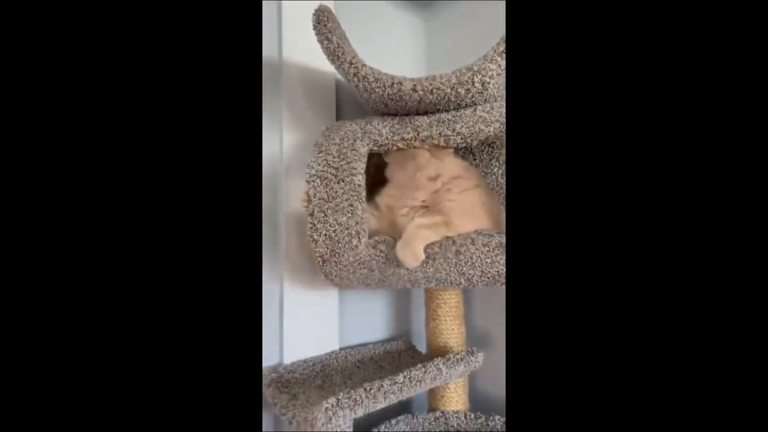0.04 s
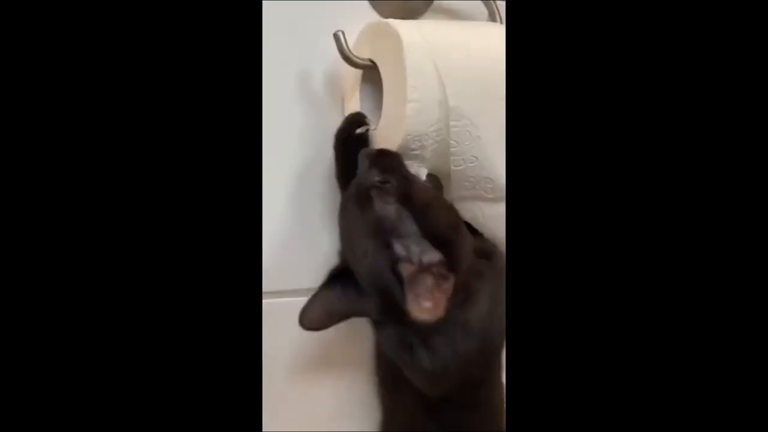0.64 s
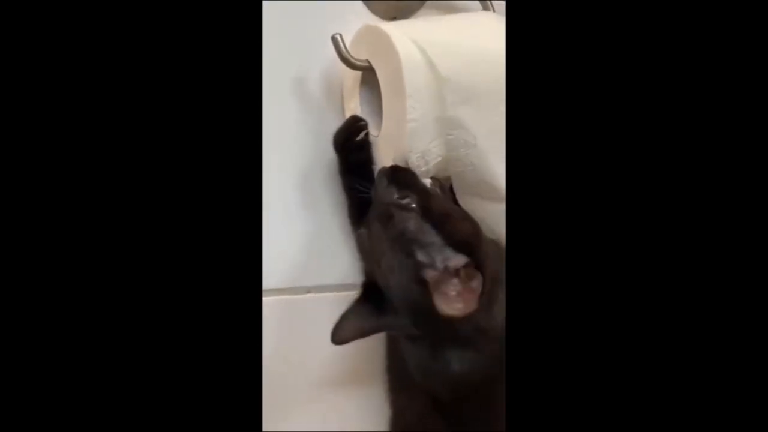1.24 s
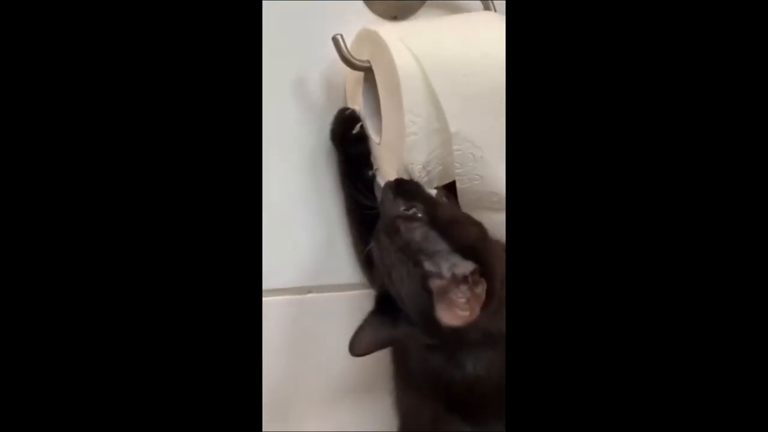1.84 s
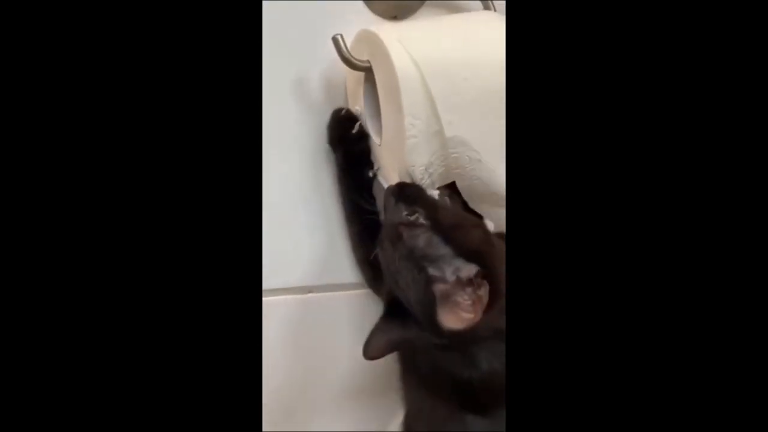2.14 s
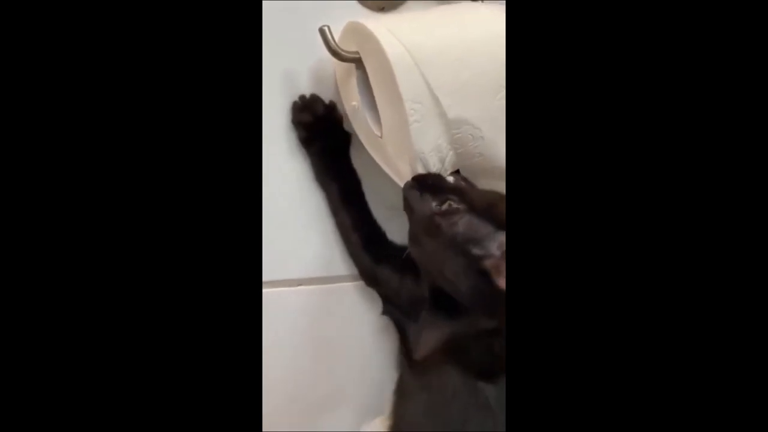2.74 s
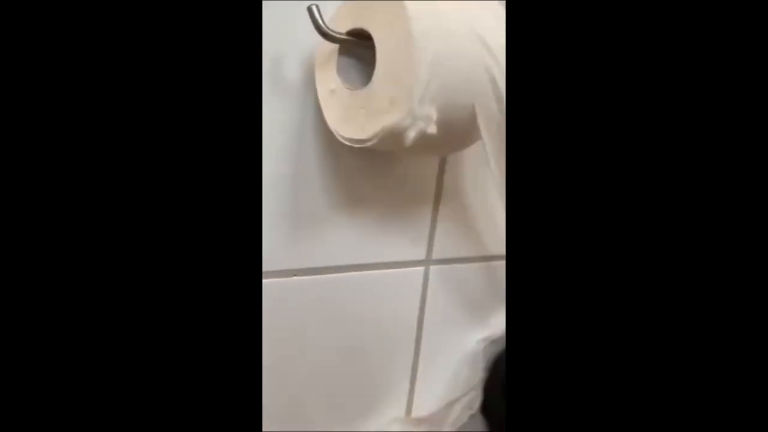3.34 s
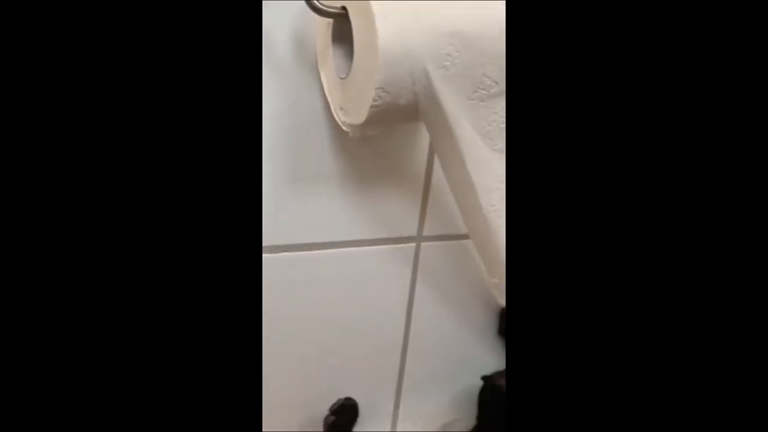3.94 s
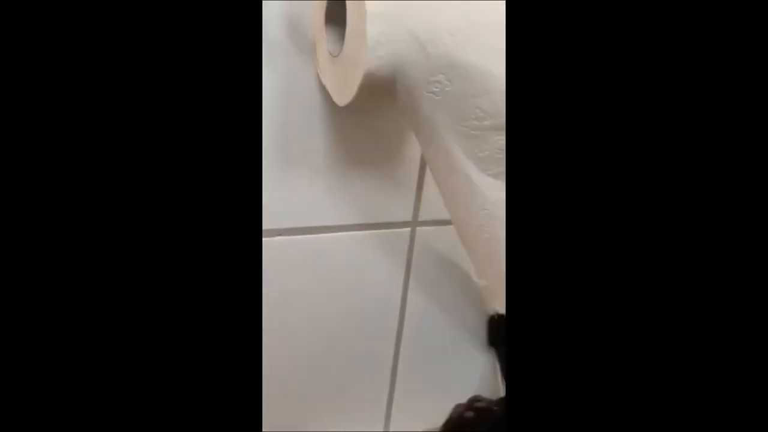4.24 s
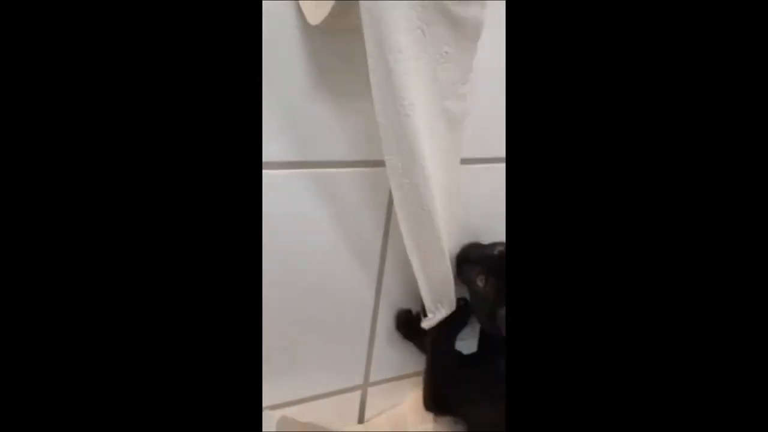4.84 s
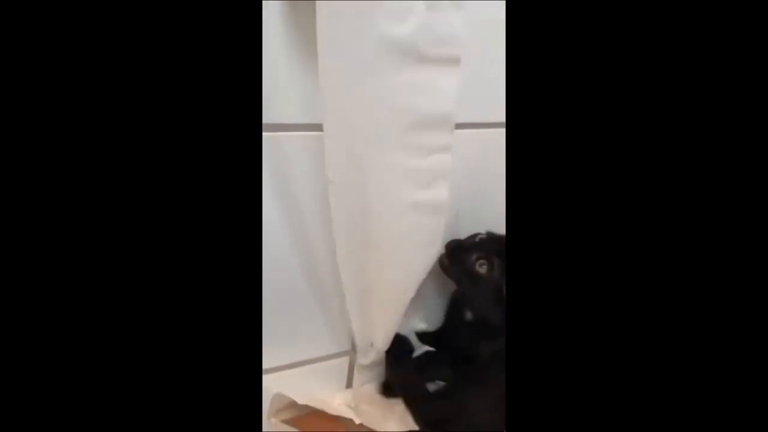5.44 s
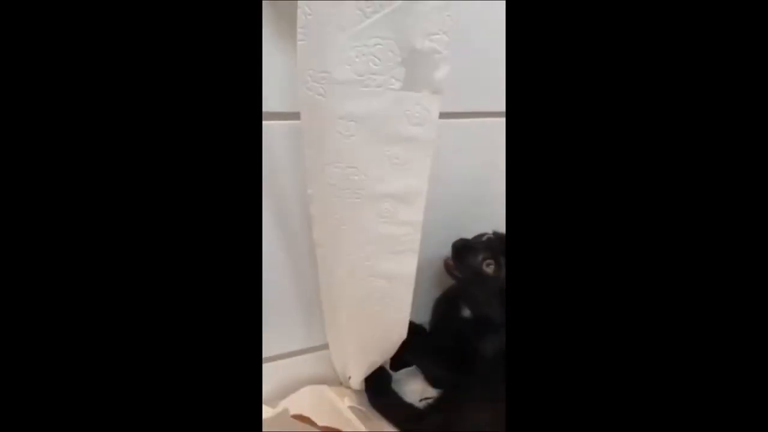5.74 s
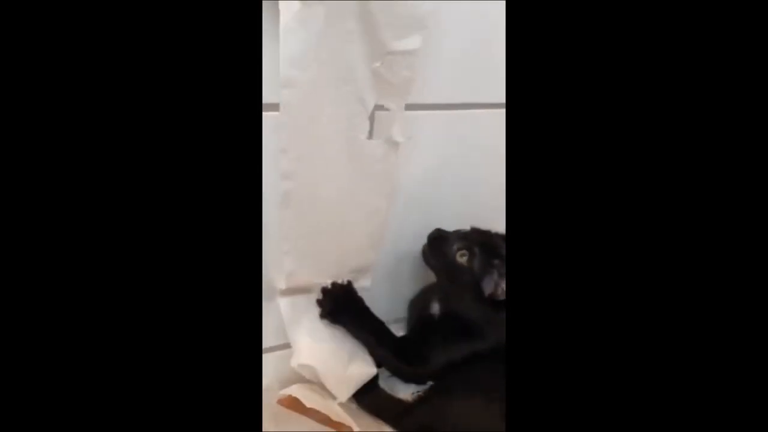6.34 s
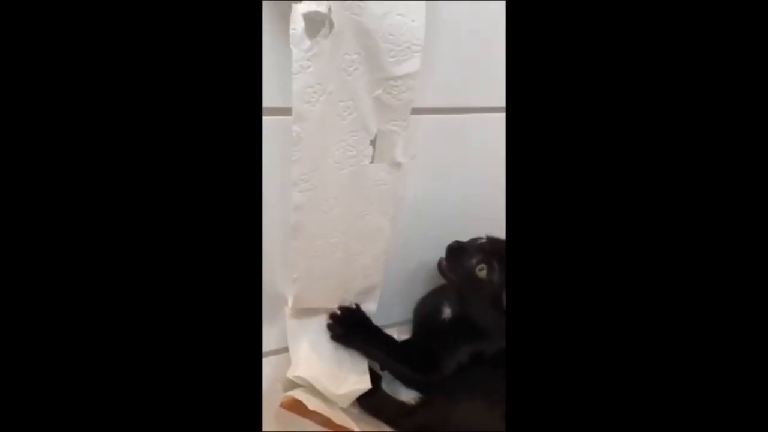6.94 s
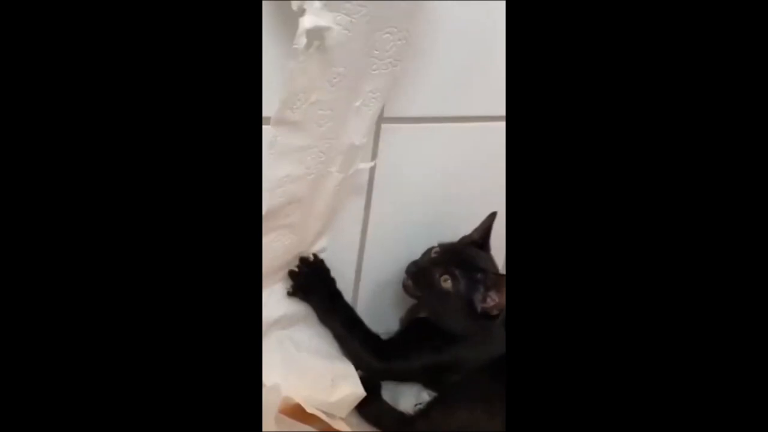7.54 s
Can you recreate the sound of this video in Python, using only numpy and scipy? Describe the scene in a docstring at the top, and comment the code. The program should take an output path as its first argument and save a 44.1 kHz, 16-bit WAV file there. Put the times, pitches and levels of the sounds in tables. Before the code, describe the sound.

After a moment of room hum, a toilet roll knocks on its holder as paws thud and paper crinkles and tears in a small bathroom.

```python
"""A humming room, where a cat scratches its carpeted tree and bumps it; after half a second the scene
changes abruptly to a small tiled bathroom. A kitten claws at a paper roll. Impacts excite damped modes:
the roll knocks on its holder and paws thud on the wall. Friction and buckling make broadband noise:
the roll rubs as it unwinds, and the snatched sheet crinkles, tears and flaps. The tiles reverberate."""
import sys
import numpy as np
from scipy import signal
from scipy.fft import rfft, irfft, next_fast_len
from scipy.io import wavfile
from scipy.ndimage import uniform_filter1d, map_coordinates

SR = 44100
rng = np.random.default_rng(int(sys.argv[2]) if len(sys.argv) > 2 else 0)


def wav_record(signal):
    """Record a signal, one row per channel, as 16-bit PCM in the file named by sys.argv[1]."""
    frames = np.transpose(np.atleast_2d(signal))
    bounded = np.clip(frames, -1, 1)
    # unit amplitude maps onto the largest positive 16-bit level
    quanta = np.round(bounded * 32767).astype(np.int16)
    wavfile.write(sys.argv[1], SR, quanta)


N = 334690
TIME = np.arange(N) / SR  # [s]
AGE = np.arange(SR // 2) / SR  # time since a blow [s]


def amp(db):
    """The decibel law: 20 dB is a factor of ten in amplitude."""
    return 10 ** (np.asarray(db) / 20)


def unit(x):
    """Normalisation to rms 1."""
    return x / np.sqrt(np.mean(x ** 2) + 1e-20)


def along(points, hz):
    """Interpolation of (frequency, value) points on a logarithmic frequency axis."""
    frequencies, values = np.transpose(points)
    return np.interp(np.log(hz + 1), np.log(frequencies), values)


def add(track, s, sound):
    """Superposition: a sound joins the track at time s."""
    part = track[..., round(s * SR):][..., :sound.shape[-1]]
    part += sound[..., :part.shape[-1]]


def wobble(rate):
    """Slow random modulation: a spline through rate knots a second."""
    knots = rng.standard_normal(int(N * rate / SR) + 4)
    return map_coordinates(knots, [TIME * rate])


def swell(s, rise, fall, hold=0):
    """Exponential growth and decay: up 60 dB in rise seconds to time s, a hold, down 60 dB in fall."""
    out = np.zeros(N)
    span = slice(max(round((s - rise) * SR), 0), round((s + hold + fall) * SR))
    age = TIME[span] - s
    depth = np.maximum(-age / rise, (age - hold) / fall)
    out[span] = np.exp(-np.log(1000) * np.maximum(depth, 0))
    return out


def fade(t60, attack):
    """Damping: after a soft onset, a blow loses 60 dB in t60 seconds."""
    return np.exp(-np.log(1000) * AGE / t60) * (1 - np.exp(-AGE / attack))


def filtered(x, response):
    """Linear filtering: the spectrum is multiplied by a frequency response."""
    n = x.shape[-1]
    size = next_fast_len(n + SR // 4)
    return irfft(rfft(x, size) * response(np.fft.rfftfreq(size, 1 / SR)), size)[..., :n]


def coloured(pair, spectrum):
    """Spectral shaping of two signals, at rms 1."""
    return unit(filtered(pair, lambda hz: amp(along(spectrum, hz))))


def noise(spectrum, length=N):
    """Filtered Gaussian noise: two independent signals with one spectrum."""
    return coloured(rng.standard_normal((2, length)), spectrum)


def grains(spectrum, rate, spread_db, smooth):
    """Stick-slip friction: tiny slips of unequal size over a share of smooth noise."""
    slips = (rng.random(N) < rate / SR) * amp(spread_db * np.minimum(rng.standard_normal(N), 2))
    rough = unit(slips * rng.standard_normal((2, N)))
    return coloured(rough + smooth * rng.standard_normal((2, N)), spectrum)


def patchy(x, depth_db):
    """Time-varying filtering: random patches of gain favour now one pitch, now another."""
    spectra = signal.stft(x, nperseg=1024)[2]
    patches = uniform_filter1d(rng.standard_normal(spectra.shape[1:]), size=8, axis=0)
    patches = uniform_filter1d(patches, size=5, axis=1)
    return signal.istft(spectra * amp(depth_db * unit(patches)), nperseg=1024)[1][:, :N]


def burst(spectrum, t60, attack):
    """Contact noise: a coloured puff with exponential decay."""
    return noise(spectrum, len(AGE)) * fade(t60, attack)


def push(spectrum):
    """A minimum-phase pulse: the sharpest causal push with a given spectrum, of peak 1."""
    n = len(AGE)
    cepstrum = irfft(np.log(amp(along(spectrum, np.fft.rfftfreq(n, 1 / SR)))), n)
    cepstrum[1:n // 2] *= 2
    cepstrum[n // 2 + 1:] = 0
    pulse = irfft(np.exp(rfft(cepstrum)), n)
    return pulse / np.abs(pulse).max()


def ring(modes, attack, scatter_db, detune):
    """Modal superposition: two sums of damped sines with scattered strengths and pitches, of peak 1."""
    pair = np.zeros((2, len(AGE)))
    for k, (hz, db, t60) in enumerate(modes):
        strength = (-1) ** k * amp(db + scatter_db * rng.normal(size=(2, 1)))
        pitch = hz * (1 + detune * rng.normal(size=(2, 1)))
        pair += strength * fade(t60, attack) * np.sin(2 * np.pi * pitch * AGE)
    return pair / np.abs(pair).max(axis=1, keepdims=True)


# Air of the first room (frequency [Hz], spectral level [dB])
AIR_SPECTRUM = [(28, -11), (55, 9), (110, -9), (250, -11.5), (430, -21.5), (560, -26.5), (1500, -31.5),
                (3700, -32), (4700, -36.5), (8000, -45.5), (10000, -65), (13000, -42), (15700, -54)]
# Tones of a machine (frequency [Hz], level [dB])
HUM_TONES = [(48.4, -47.5), (247.6, -62.5), (414.5, -59)]
def humming_room():
    """Phase modulation: a machine's tones waver slightly over the broadband noise of the air."""
    hum = sum(amp(db) * np.sqrt(2) * np.sin(2 * np.pi * hz * TIME + 0.73 * wobble(4.6))
              for hz, db in HUM_TONES)
    return hum + amp(-39.5) * noise(AIR_SPECTRUM)


# Background of the bathroom (frequency [Hz], spectral level [dB])
AMBIENT_SPECTRUM = [(20, -18), (45, 3), (68, 6.5), (95, -0.5), (130, -17), (320, -15.5), (500, -18.5),
                    (1200, -27.5), (4000, -37.5), (12000, -52.5), (15700, -61.5)]
def bathroom_ambience():
    """Stationary noise: a faint, steady rumble."""
    return amp(-69.0) * noise(AMBIENT_SPECTRUM)


# Reverberation of the bathroom (frequency [Hz], T60 [s])
TILE_DECAY = [(80, 0.7), (260, 0.65), (700, 0.23), (2000, 0.35), (5000, 0.39), (13000, 0.074)]
def bathroom(x, wet_db):
    """Reverberation by convolution: early reflections off the nearest tiles and a diffuse tail."""
    hz, t, spectra = signal.stft(rng.standard_normal((2, SR // 2)), SR, nperseg=256)
    decay = np.exp(-np.log(1000) * t / along(TILE_DECAY, hz)[:, None])
    tail = signal.istft(spectra * decay, SR, nperseg=256)[1]
    tail = tail[:, :len(AGE)] * (1 - np.exp(-AGE / 0.0015))
    tail /= np.linalg.norm(tail[0])
    for channel in tail:
        reflections = 0.094 * rng.choice([-1, 1], size=4)
        delays = (SR * rng.uniform(.0008, .009, size=4)).astype(int)
        channel[delays] += reflections
    echo = signal.fftconvolve(np.atleast_2d(x), tail, axes=1)
    return x + amp(wet_db) * echo[:, :x.shape[-1]]


# Soft bumps of the cat tree (time [s], level [dB], frequency [Hz], T60 [s])
TREE_BUMPS = [(0.282, -30.5, 355, 0.04), (0.397, -2.5, 204, 0.016), (0.407, -6.5, 143, 0.044),
              (0.428, -12.5, 64, 0.12), (0.447, -8.5, 107, 0.029)]
def tree_bumps():
    """Damped oscillation: each bump of the cat excites one low mode of its perch."""
    out = np.zeros(N)
    for s, db, hz, t60 in TREE_BUMPS:
        add(out, s, amp(db) * fade(t60, attack=0.0058) * np.sin(2 * np.pi * hz * AGE))
    return out


# Claws, then fur, on carpet (frequency [Hz], spectral level [dB])
SCRATCH_SPECTRUM = [(500, -55), (1500, -7), (2100, -3.5), (2600, 6.5), (3300, -5), (4600, -15),
                    (6500, -11.5), (8200, -2), (10000, -27), (12500, -9.5), (15700, -22)]
BRUSH_SPECTRUM = [(200, -5), (400, 6), (1000, 8.5), (1800, 1), (2600, -4), (3900, -0.5), (4700, -6),
                  (8000, -11.5), (10000, -53), (13000, -11), (15700, -34)]
# The cat's strokes (time [s], scratch level [dB], brush level [dB], rise [s], fall [s])
CARPET_STROKES = [(.02, -61, -83, 0.17, 0.62), (0.144, -41, -69, 0.084, 0.29),
                  (.285, -60.5, -47, 0.38, 0.17), (.41, -64, -58.5, 0.15, 1)]
def carpet_strokes():
    """Sliding friction: claws scratch and fur brushes the carpet in swells of noise."""
    scratch, brush = sum(amp([[scratch_db], [brush_db]]) * swell(s, rise, fall)
                         for s, scratch_db, brush_db, rise, fall in CARPET_STROKES)
    return patchy(scratch * noise(SCRATCH_SPECTRUM) + brush * noise(BRUSH_SPECTRUM), depth_db=3.5)


# Claws catch on fibres, in both rooms (time [s], level [dB], frequency [Hz], half length [s])
CLAW_RASPS = [(0.02, -62, 4280, 0.089), (0.11, -53, 3670, 0.07), (0.19, -53, 3520, 0.058),
              (1.793, -62, 2600, 0.0047), (4.566, -56.5, 3140, 0.012), (4.741, -51, 3700, .009),
              (5.633, -54, 5970, 0.023), (6.102, -42, 3180, 0.014), (6.105, -46, 2450, 0.016),
              (6.614, -56, 4370, 0.006), (6.636, -57, 6040, 0.007), (6.658, -65.5, 3430, 0.013),
              (6.738, -73, 4400, 0.0093)]
def claw_rasps():
    """Nearly periodic stick-slip: a claw crossing fibres gives a swell of narrow-band noise."""
    out = np.zeros((2, N))
    for s, db, hz, half_length in CLAW_RASPS:
        band = [(hz / 2, -45), (hz * 0.9, -16), (hz, 0), (hz * 1.05, -16), (hz * 2, -45), (hz * 4, -80)]
        start = max(s - 3 * half_length, 0)
        envelope = np.exp(-((AGE + start - s) / half_length) ** 2)
        add(out, start, amp(db) * noise(band, len(AGE)) * envelope)
    return out


# Modes of the wall panel (frequency [Hz], level [dB], T60 [s])
WALL_MODES = [(174, -6.5, 0.06), (233.9, 2.5, 0.079), (325, -2, 0.051), (370, -5, 0.089),
              (472, -0.5, 0.044), (640, -16.5, 0.037)]
# Paws and the heavy roll hit the wall (time [s], level [dB], relative boom level [dB])
WALL_THUDS = [(1.714, -42, -24), (2.331, -43.5, -10), (2.524, -39.5, -20.5), (2.987, -20.5, -10),
              (3.001, -22.5, -32), (3.038, -50, 8), (3.281, -26.5, -5.5), (3.296, -37, -12),
              (3.41, -29.5, -19), (3.5, -37, -18.5), (3.982, -42.5, -21), (4.35, -48, -13),
              (4.719, -27.5, -15), (4.743, -49, -13), (4.809, -39.5, -24), (5.515, -43, -10.5),
              (5.615, -48, -3.5), (5.87, -52, -17), (6.074, -34.5, -11), (6.104, -38, -5),
              (6.736, -55.5, -3), (6.861, -57.5, -14.5), (7.051, -59.5, -15.5), (7.542, -44, -7)]
def wall_thuds():
    """Resonance: padded blows excite the wall panel and the low standing waves of the small room."""
    room_modes = [(46.64, -13.0, 0.36), (71.8, -9.5, 0.74), (96.2, -10.0, 0.67), (121, -3.5, 0.11)]
    out = np.zeros((2, N))
    for s, db, boom_db in WALL_THUDS:
        panel = ring(WALL_MODES, attack=0.0076, scatter_db=3.5, detune=0.021)
        boom = ring(room_modes, attack=0.018, scatter_db=-4.0, detune=0.048)
        add(out, s, amp(db) * (bathroom(panel, wet_db=-12.0) + amp(boom_db) * boom))
    return out


def favour(rows, spot_hz, weight):
    """Selective excitation: levels fall with the square of the octaves from the struck spot's note."""
    return [(hz, db - weight * 7.5 * np.log2(hz / spot_hz) ** 2, *rest) for hz, db, *rest in rows]


# First push, dull wound paper, hard claw or holder (frequency [Hz], spectral level [dB])
BLOW_SPECTRUM = [(100, -31.5), (300, -4.5), (700, -2), (1100, -1.5), (1550, -2), (2100, -14.5), (3000, -25),
                 (6000, -38), (14000, -70)]
CLUNK_SPECTRUM = [(70, -29), (260, -1), (430, -6), (650, -1.5), (1100, -4.5), (1700, -10.5), (2600, -16),
                  (4000, -19.5), (14000, -79)]
CRACK_SPECTRUM = [(600, -15), (1500, -4), (3500, 2.5), (5000, -7.5), (7500, -3), (11500, -22.5),
                  (13000, -28.5), (14200, -60)]
# Modes of the cardboard core and holder (frequency [Hz], level [dB], T60 [s])
CORE_MODES = [(429.3, 3, 0.022), (534.6, 2, 0.035), (658.5, 2, 0.032), (883, 2.5, 0.034),
              (1087, 0.5, 0.045), (1392, -3.5, 0.034), (2050, -1.5, 0.02)]
# Knocks (time [s], level [dB], spot's note [Hz], relative crack level [dB], relative ring level [dB])
ROLL_KNOCKS = [(0.822, -45.5, 1120, -18, -4), (0.867, -55, 1280, -17, -1), (1.082, -40.5, 880, -16, -4),
               (1.377, -43, 1070, -13, -10), (1.419, -45, 1140, -26, -7), (1.49, -47, 700, -19, 2),
               (1.661, -51.5, 855, -10, 1), (1.713, -35.5, 493, -24, 3.5), (2.174, -35, 1400, -13, -11),
               (2.317, -28.5, 1350, -3.5, -6), (2.324, -24.5, 1110, -8.5, 0), (2.329, -30.5, 1140, -19, 3),
               (2.402, -28, 820, -5, 2.5), (2.47, -30.5, 870, -5.5, 0), (2.484, -33, 770, -6.5, 0),
               (2.518, -29.5, 900, -0.5, 2), (2.736, -36, 1220, -13, -11.5), (2.825, -45.5, 1170, -7, -9.5),
               (2.972, -9.5, 1350, -23, -1.5), (2.986, -12, 1070, -23, -2.5),
               (3.002, -15.5, 714, -21, -2.5), (3.228, -29.5, 1020, -6, -7), (3.279, -26, 596, -7.5, -7),
               (3.2934, -17, 956, -16, -2.5), (3.304, -25, 702, -6.5, -8), (3.374, -33, 1230, -9.5, -2.5),
               (3.409, -28.5, 880, -5, -7.5), (3.422, -28.5, 1100, -6.5, -6.5),
               (4.721, -32.5, 735, -13, -0.5), (4.741, -29, 447, -4, -7), (4.776, -34, 570, -17, -13),
               (4.807, -29.5, 1340, -5, -2), (4.819, -33, 1290, -5, 3), (4.928, -44, 930, -16, 3.5),
               (5.188, -58, 1380, 2, 10.5), (5.366, -57, 1340, -10, 3), (5.421, -49, 1430, -4, 3.5)]
SPOT_DB, SPOT_T60_S = 8.5, 0.016  # the struck spot's own brief note, among the core's modes
def roll_knocks():
    """Impact excitation: the roll hits its holder with a push, a modal ring, a clunk and a crack."""
    out = np.zeros((2, N))
    for s, db, spot_hz, crack_db, ring_db in ROLL_KNOCKS:
        modes = [(spot_hz, SPOT_DB, SPOT_T60_S)] + favour(CORE_MODES, spot_hz, weight=1.5)
        blow = amp(-4) * push(favour(BLOW_SPECTRUM, spot_hz, weight=0.24))
        blow = blow * np.array([[1], [.15]])  # mostly mid, little side
        body = amp(ring_db) * ring(modes, attack=0.0036, scatter_db=4.5, detune=0.018)
        clunk = amp(-8.5) * burst(favour(CLUNK_SPECTRUM, spot_hz, weight=0.36), t60=0.045, attack=.001)
        crack = amp(crack_db) * burst(CRACK_SPECTRUM, t60=0.018, attack=0.00053)
        add(out, s, amp(db) * bathroom(blow + body + clunk + crack, wet_db=-6.5))
    return out


# Bright hiss of the paper (frequency [Hz], spectral level [dB])
HISS_SPECTRUM = [(1500, -47.5), (5000, -13), (6800, -6.5), (8000, 0), (10800, -1.5), (12300, -6.5),
                 (13100, -19), (13900, -50.5)]
# A claw tears the top ply (time [s], level [dB], rise [s], fall [s])
PLY_TEARS = [(2.478, -46.5, 0.029, 0.018), (3.05, -46, 0.045, 0.071), (3.2, -38, 0.016, 0.018),
             (3.3, -44.5, 0.0099, 0.1), (3.389, -45, .05, 0.029), (3.414, -43, 0.016, 0.04),
             (3.503, -40, 0.14, 0.019), (3.526, -52, 0.018, 0.052), (4.265, -60, 0.07, 0.2),
             (4.717, -40.5, 0.018, 0.014), (4.85, -50, 0.019, 0.098), (6.1, -44, 0.065, 0.024),
             (6.16, -54, 0.04, 0.053)]
def bright_hiss(crumple):
    """Modulated noise: a randomly flickering, patchy hiss follows the crumpling and flares at tears."""
    flicker = amp(5.5 * np.minimum(wobble(rate=27), 1))
    tearing = sum(amp(db) * swell(s, rise, fall) for s, db, rise, fall in PLY_TEARS)
    hiss = grains(HISS_SPECTRUM, rate=2600, spread_db=3.0, smooth=0.56)
    return unit(patchy(hiss, depth_db=5.5)) * (amp(-5.5) * crumple * flicker + tearing)


def snap(hz, t60):
    """Sudden release of strain: a dry tick of noise around one pitch, of peak 1."""
    size, top_hz, octave_loss_db = 2048, 13000, 7.5
    bins_hz = np.fft.rfftfreq(size, 1 / SR) + 1
    colour = amp(-octave_loss_db * np.log2(bins_hz / hz) ** 2) * (bins_hz < top_hz)
    tick = irfft(rfft(rng.standard_normal((2, size))) * colour) * fade(t60, attack=.0009)[:size]
    return tick / np.abs(tick).max()


# Perforations and fibres snap under a claw or tooth (time [s], level [dB], frequency [Hz])
FIBRE_SNAPS = [(1.378, -54.5, 2840), (2.403, -40.5, 8450), (2.519, -37.5, 8500), (3.2, -29.5, 8540),
               (3.229, -29.5, 8150), (3.2942, -21.5, 2600), (3.298, -31.5, 9500), (4.809, -36, 8000),
               (4.819, -45, 7000), (6.627, -49, 8500)]
CREASES_PER_S, CREASE_HZ, CREASE_OCTAVES = 45, 4000, 0.72
CREASE_DB, CREASE_SPREAD_DB = 1.5, 4  # weakest peak relative to the crumpling; scatter above it
def crackles(crumple):
    """Fracture and buckling: fibres snap, and creases pop at random, louder as the sheet crumples."""
    snaps, creases = np.zeros((2, N)), np.zeros((2, N))
    for s, db, hz in FIBRE_SNAPS:
        add(snaps, s, amp(db) * snap(hz, t60=0.025))
    for when, pitch, strength in rng.random((int(CREASES_PER_S * N / SR), 3)):
        hz = CREASE_HZ * 2 ** (CREASE_OCTAVES * (2 * pitch - 1))
        db = CREASE_DB + CREASE_SPREAD_DB * min(-np.log(1 - strength), 2)
        add(creases, when * N / SR, amp(db) * snap(hz, t60=.009))
    return snaps + crumple * creases


# The kitten's continual stirring of the paper (time [s], level [dB])
PAPER_STIR = [(.6, -70.5), (1.2, -67.5), (1.58, -72), (2.27, -71), (2.9, -65), (3.6, -63.5), (4.12, -65),
              (4.75, -62.5), (5.3, -68.5), (5.7, -78), (5.89, -78.5), (6.25, -68), (6.6, -68.5),
              (6.8, -87.5), (7.24, -95.5), (7.4, -72), (7.59, -62)]
# Long pulls drag paper off the roll (time [s], duration [s], crumple level [dB], drag level [dB])
PAPER_PULLS = [(0.822, 0.446, -112, -67), (1.502, 0.095, -111, -62), (1.975, 0.25, -67, -78),
               (2.427, 0.23, -63, -61.5), (3.007, 0.095, -52.5, -41.5), (3.127, 0.39, -61.5, -51),
               (4.816, 0.24, -66, -65), (5.395, 0.3, -75, -77), (6.126, 0.12, -67.5, -65.5)]
# Claws snatch at the sheet (time [s], crumple level [dB], relative drag level [dB], rise [s], fall [s])
PAPER_SNATCHES = [(.815, -66, -9, 0.026, 0.065), (1.491, -60.5, -2, 0.01, 0.039),
                  (1.66, -62.5, 4.5, 0.023, 0.38), (1.724, -48, -29, 0.026, 0.05),
                  (2.322, -45.5, -1, 0.044, 0.13), (2.517, -45, 14, 0.0052, 0.043),
                  (2.826, -53.5, 8, 0.012, 0.053), (2.984, -33.5, 11.5, 0.038, 0.1),
                  (3.198, -45.5, 7, 0.014, 0.046), (3.227, -45, 7.5, 0.0076, 0.092),
                  (3.298, -38, 0.5, 0.052, 0.39), (3.412, -37, 0.5, 0.014, 0.26),
                  (3.989, -49, -1, 0.067, 0.076), (4.35, -70, 4, 0.049, 0.29),
                  (4.565, -54, -0.5, 0.1, 0.04), (4.722, -47, 6, 0.066, 0.13), (4.742, -50, 4, 0.06, 0.15),
                  (4.808, -42, -3.5, 0.0049, 0.15), (5.001, -50.5, 5, 0.022, 0.053),
                  (5.628, -54.5, 1, 0.93, 0.43), (5.962, -67.5, 3, 0.064, 0.24),
                  (6.073, -51.5, 3.5, 0.035, 0.1), (6.098, -45.5, 2.5, 0.046, 0.16),
                  (6.503, -64, -1, 0.2, 0.11), (6.607, -71, 2, 0.09, 0.035),
                  (6.636, -53.5, -2.5, 0.027, 0.099), (7.314, -66.5, -4.5, 0.098, 0.22),
                  (7.357, -60.5, -1, 0.14, 0.11), (7.545, -53, 6, 0.03, 0.22)]
def paw_envelopes():
    """Amplitude modulation: the paws set the sheet's crumpling, the roll's drag and the slow motion."""
    crumple = amp(np.interp(TIME, *np.transpose(PAPER_STIR)))
    drag = amp(-2) * crumple
    for s, length, crumple_db, drag_db in PAPER_PULLS:
        pull = swell(s, rise=0.1, fall=0.11, hold=length)
        crumple += amp(crumple_db) * pull
        drag += amp(drag_db) * pull
    motion = np.hypot(crumple, drag)
    jerk = amp(2.0 * wobble(rate=20))  # the paws move in small jerks
    crumple, drag = crumple * jerk, drag * jerk
    for s, db, drag_db, rise, fall in PAPER_SNATCHES:
        snatch = amp(db) * swell(s, rise, fall)
        crumple += snatch
        drag += amp(drag_db) * snatch
    return crumple, drag, motion


# Crinkling sheet, rubbing roll, flapping sheet (frequency [Hz], spectral level [dB])
CRINKLE_SPECTRUM = [(400, -20.5), (1200, 0), (2200, 2), (3300, 0), (4900, -3), (6500, -2), (8000, -9.5),
                    (10500, -8.5), (12300, -17), (13100, -28.5), (13900, -53)]
RUB_SPECTRUM = [(200, -9), (480, 2), (950, 5.5), (1400, 0.5), (2000, -5.5), (3200, -14), (6000, -43),
                (14000, -69)]
FLAP_SPECTRUM = [(40, -21), (80, 2.5), (140, -9.5), (230, -4), (330, -2.5), (500, -12), (900, -20.5),
                 (2000, -40), (14000, -96)]
FLAP_DB, FLAP_EXPONENT = -23, 0.68  # the flap grows as a power of the motion
LOOSE_S, WOUND_DB = 2.7, -8  # the sheet comes loose; until then it flaps this much less
def paper():
    """Buckling, friction and displaced air: the sheet crinkles, the roll rubs, the hanging end flaps."""
    crumple, drag, motion = paw_envelopes()
    crinkle = amp(-3.0) * crumple * grains(CRINKLE_SPECTRUM, rate=1000, spread_db=-1.0, smooth=1.0)
    rub = drag * grains(RUB_SPECTRUM, rate=250, spread_db=-2.5, smooth=1.0)
    flapping = amp(FLAP_DB + WOUND_DB * (TIME < LOOSE_S)) * motion ** FLAP_EXPONENT
    flap = flapping * grains(FLAP_SPECTRUM, rate=66, spread_db=4.5, smooth=0.75)
    rustle = patchy(crinkle + rub, depth_db=3) + bright_hiss(crumple) + crackles(crumple)
    return bathroom(rustle, wet_db=-9.0) + flap


def microphones(pair, correlation):
    """Mid-side stereo: two independent signals become a left and a right of given correlation."""
    def weights(hz):
        angle = np.arccos(np.clip(along(correlation, hz), -1, 1)) / 2
        return np.array([np.cos(angle), np.sin(angle)])
    mid, side = filtered(pair, weights)
    return np.array([mid + side, mid - side])


# Likeness of left and right in each room (frequency [Hz], correlation [-1 to 1])
FIRST_ROOM_CORRELATION = [(80, 1), (260, 0.7), (400, 1), (680, 0.1), (1300, 0.77), (4000, 0.6),
                          (11000, 0.77)]
BATHROOM_CORRELATION = [(60, 0.99), (150, 0.93), (260, 1), (380, 0.2), (520, 0.15), (690, -0.28),
                        (950, -0.011), (1800, 0.45), (2700, 0.058), (3800, 0.11), (5400, -0.24),
                        (8000, 0.55), (12000, 0.69)]
# Stereo balance of the bathroom (frequency [Hz], left minus right level [dB])
BATHROOM_BALANCE = [(60, 1), (150, -5.5), (260, -7.5), (500, -3.5), (720, 0.5), (1200, 3), (2200, -1),
                    (12000, 0)]
CHANGE_S = 0.537  # the first room gives way to the bathroom
def scene():
    """Superposition in each room: the first stops within 2 ms, then the bathroom enters over 40 ms."""
    before = np.clip((CHANGE_S - TIME) / .002, 0, 1)
    after = np.clip((TIME - CHANGE_S) / 0.04, 0, 1) ** 2
    kitten = after * (roll_knocks() + wall_thuds() + paper() + bathroom_ambience())
    kitten_and_rasps = microphones(kitten + claw_rasps(), BATHROOM_CORRELATION)
    balanced = filtered(kitten_and_rasps, lambda hz: amp(along(BATHROOM_BALANCE, hz) * [[.5], [-.5]]))
    cat = microphones(humming_room() + tree_bumps() + carpet_strokes(), FIRST_ROOM_CORRELATION)
    return before * cat + balanced


LOW_CUT_HZ, TOP_HZ = 36, 15700
def record(dry):
    """Band limiting: the deepest rumble and the highest treble are filtered out."""
    low_cut = signal.butter(4, LOW_CUT_HZ, "highpass", fs=SR, output="sos")
    return filtered(signal.sosfilt(low_cut, dry), lambda hz: hz < TOP_HZ)


dry = scene()
out = record(dry)
wav_record(out)
```